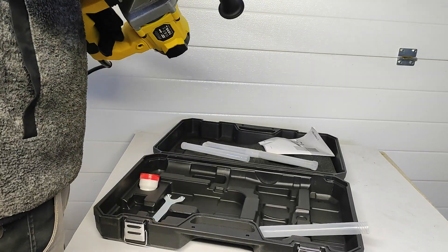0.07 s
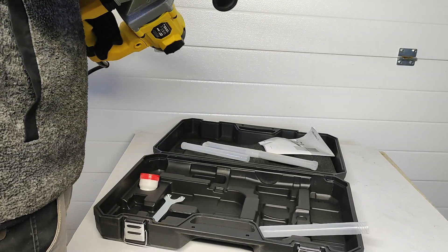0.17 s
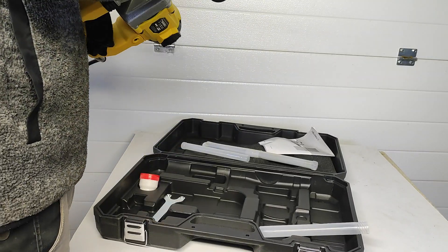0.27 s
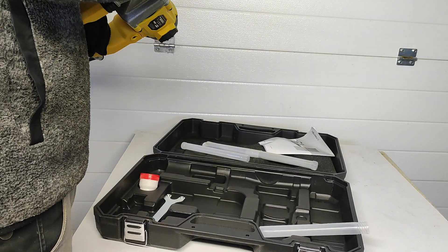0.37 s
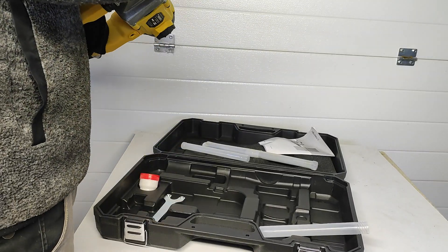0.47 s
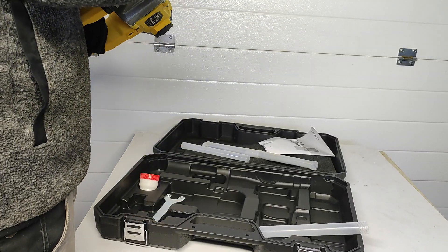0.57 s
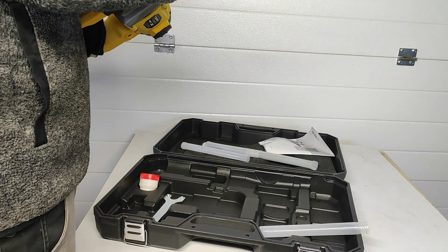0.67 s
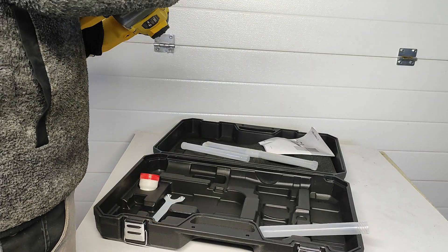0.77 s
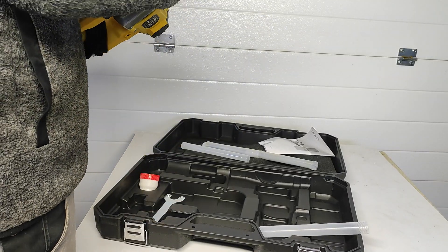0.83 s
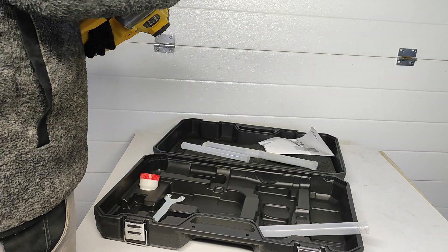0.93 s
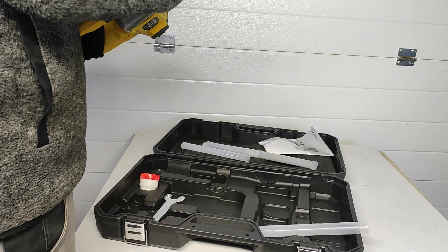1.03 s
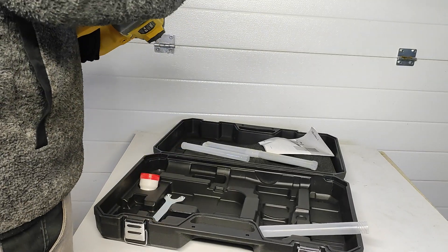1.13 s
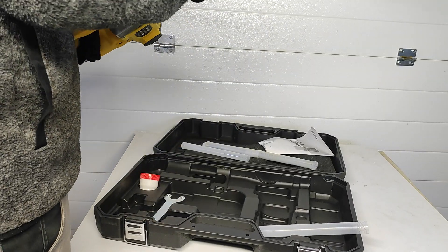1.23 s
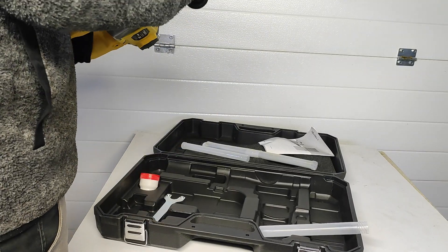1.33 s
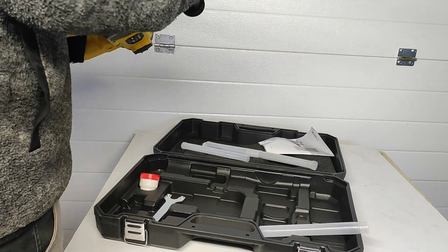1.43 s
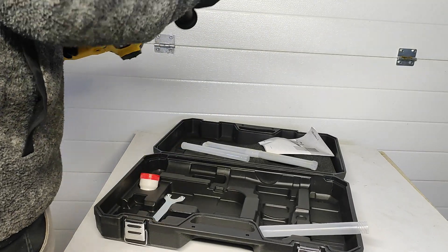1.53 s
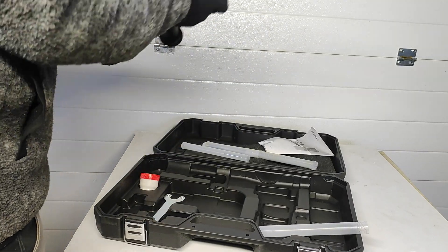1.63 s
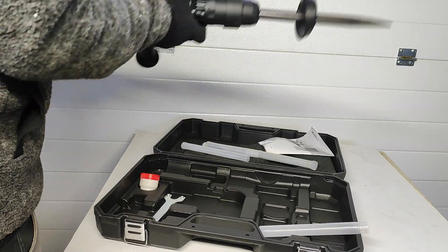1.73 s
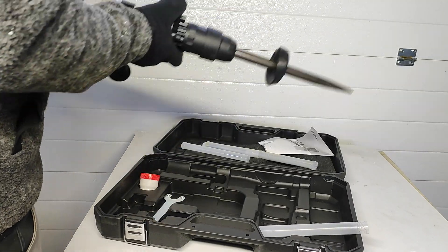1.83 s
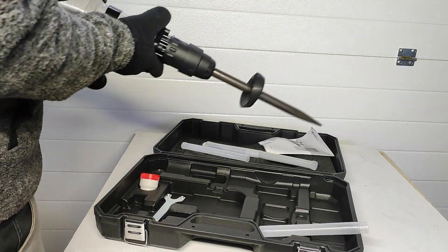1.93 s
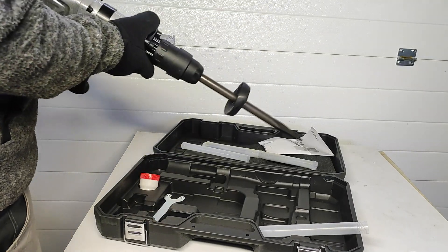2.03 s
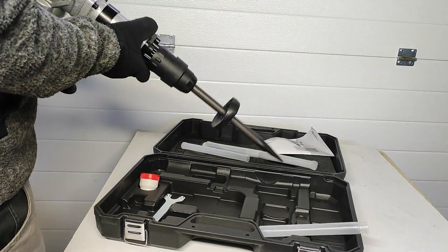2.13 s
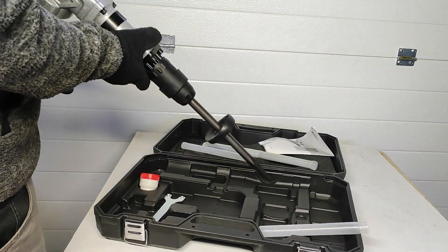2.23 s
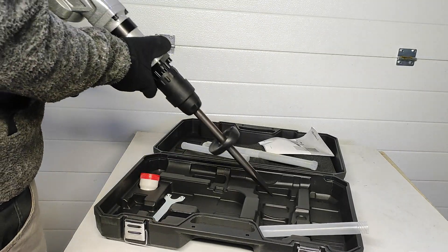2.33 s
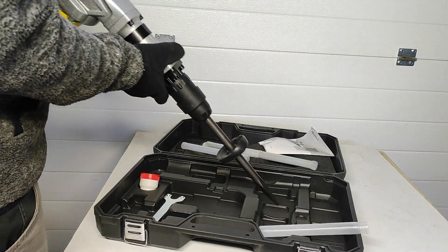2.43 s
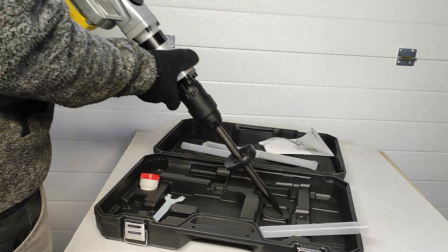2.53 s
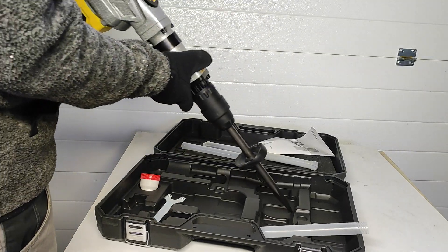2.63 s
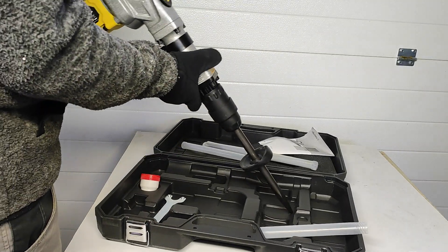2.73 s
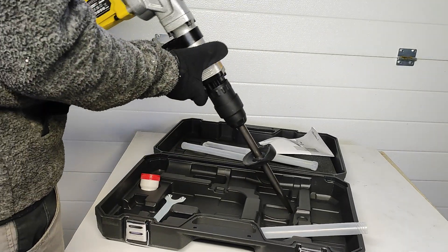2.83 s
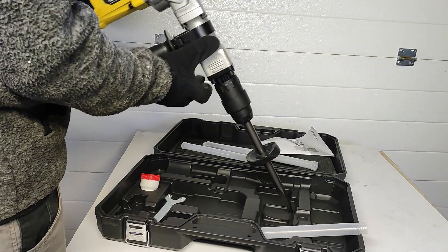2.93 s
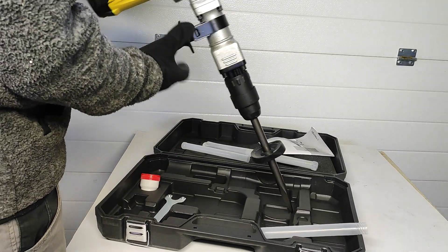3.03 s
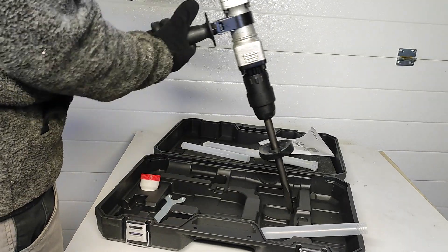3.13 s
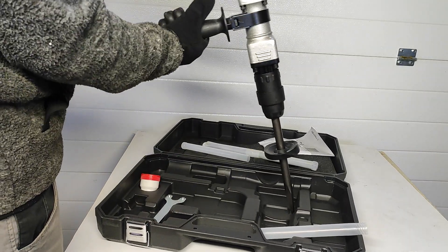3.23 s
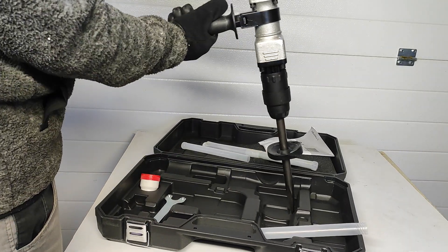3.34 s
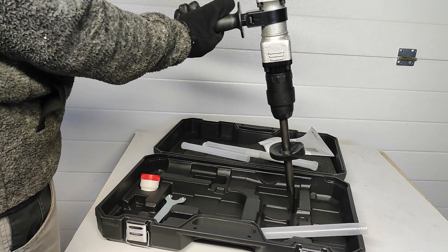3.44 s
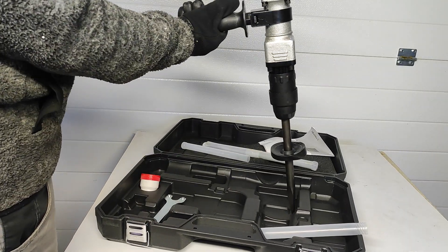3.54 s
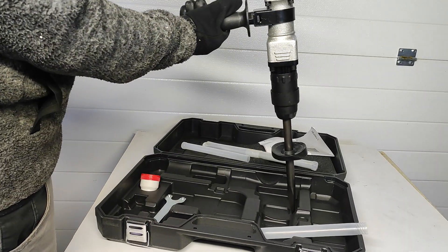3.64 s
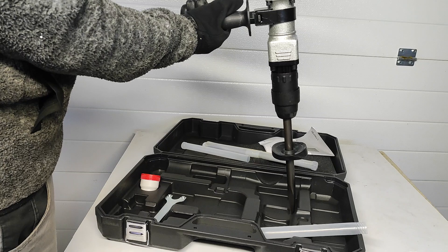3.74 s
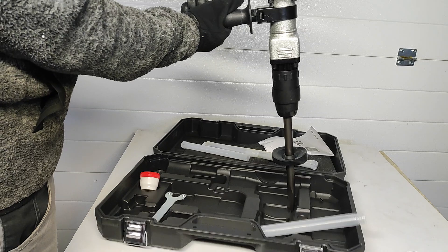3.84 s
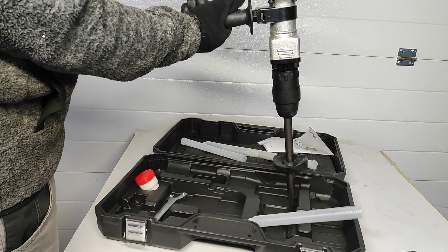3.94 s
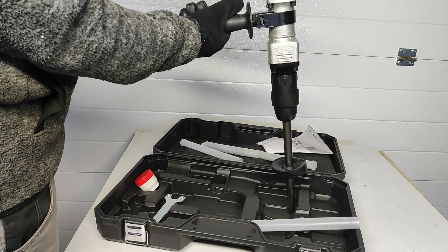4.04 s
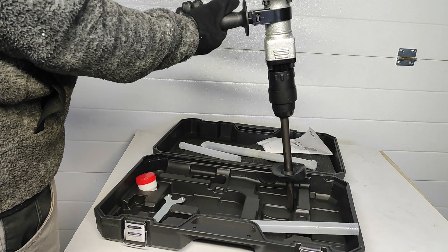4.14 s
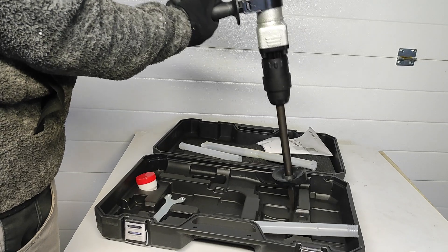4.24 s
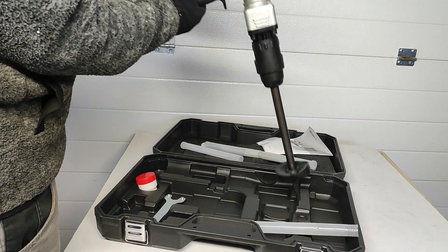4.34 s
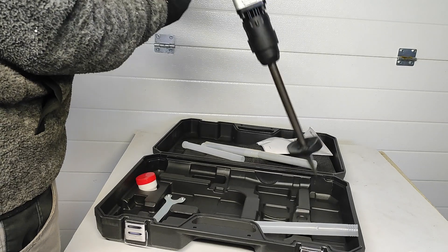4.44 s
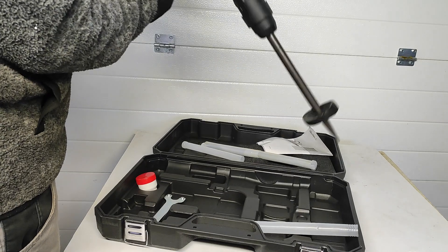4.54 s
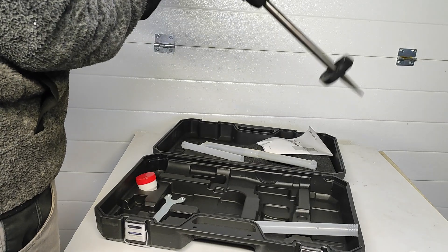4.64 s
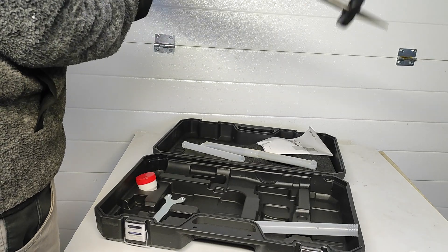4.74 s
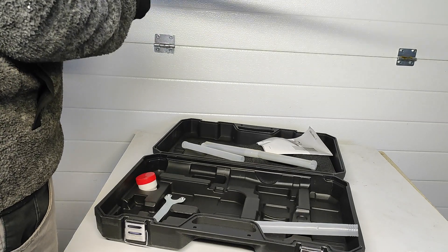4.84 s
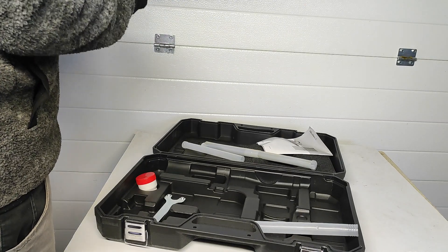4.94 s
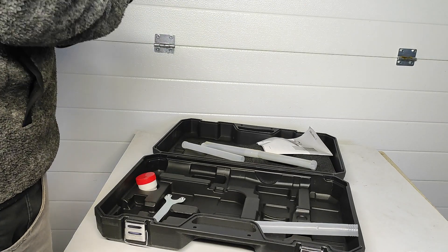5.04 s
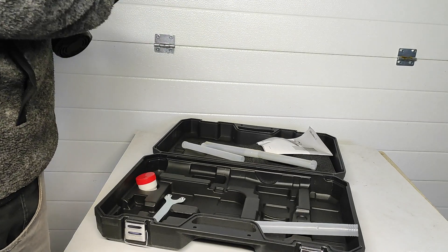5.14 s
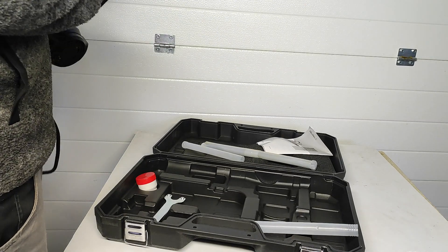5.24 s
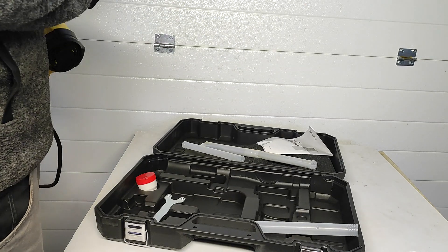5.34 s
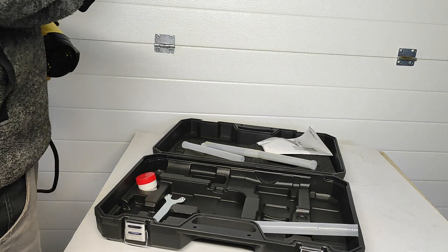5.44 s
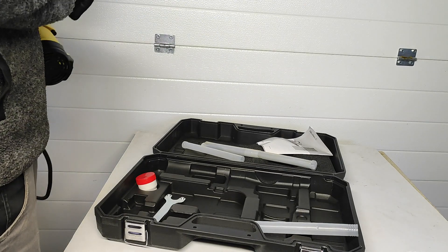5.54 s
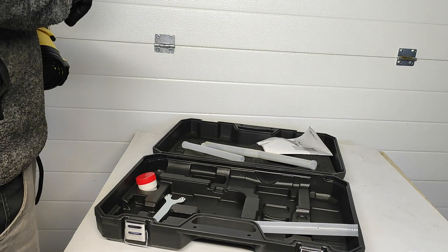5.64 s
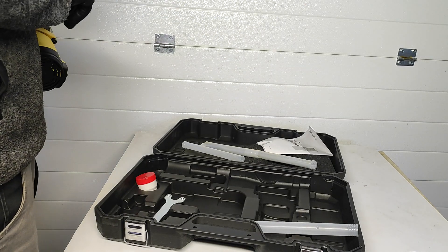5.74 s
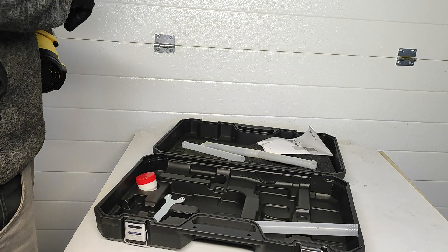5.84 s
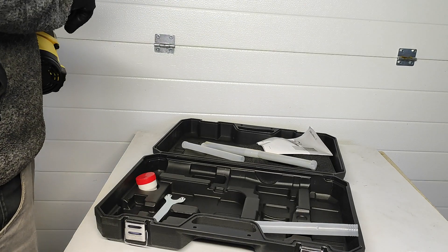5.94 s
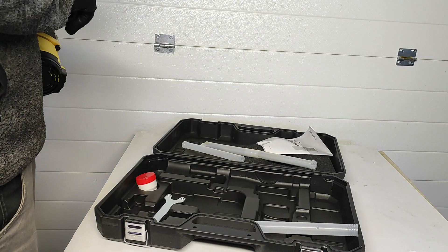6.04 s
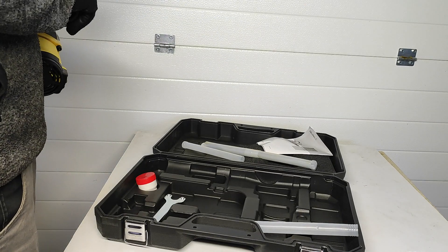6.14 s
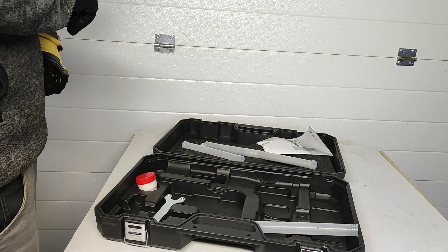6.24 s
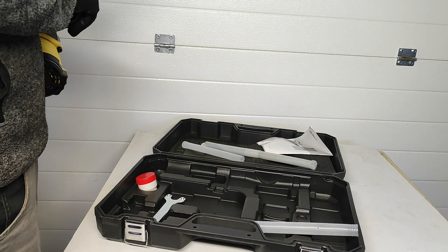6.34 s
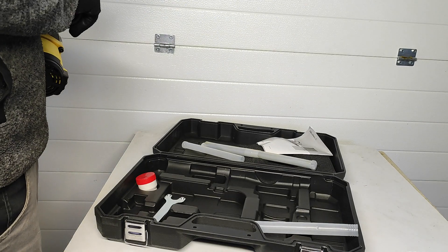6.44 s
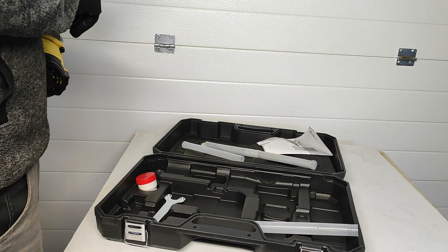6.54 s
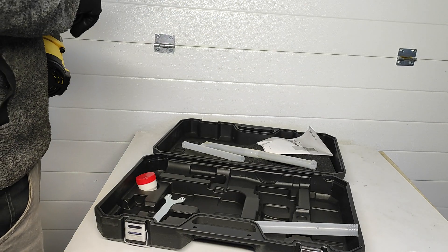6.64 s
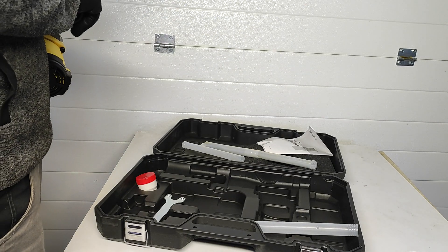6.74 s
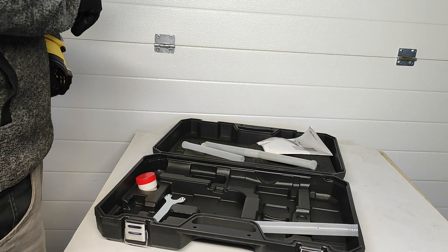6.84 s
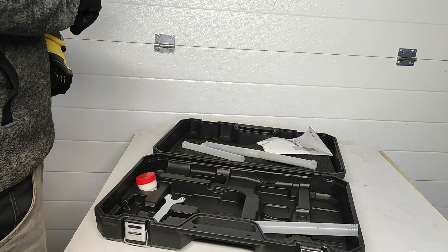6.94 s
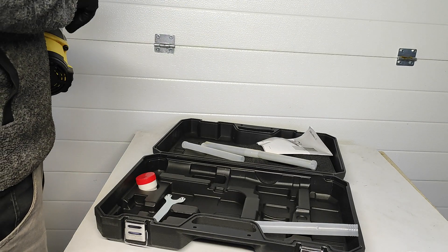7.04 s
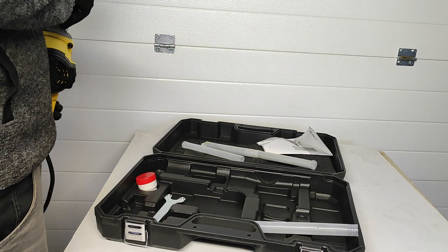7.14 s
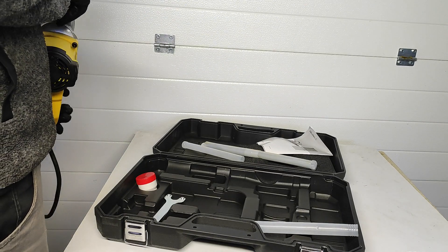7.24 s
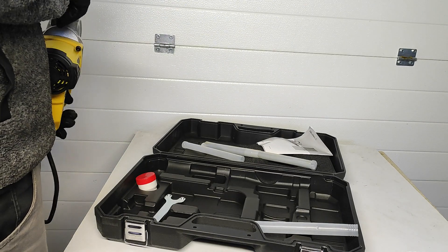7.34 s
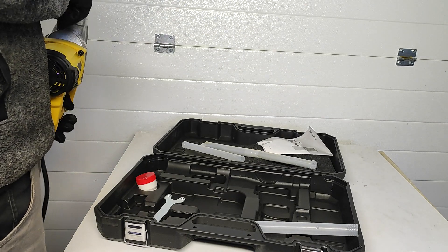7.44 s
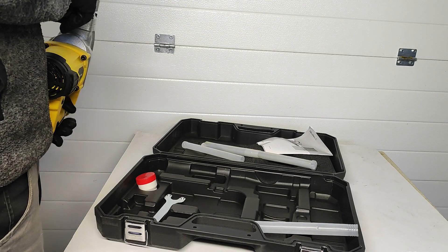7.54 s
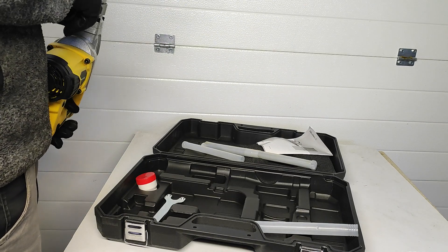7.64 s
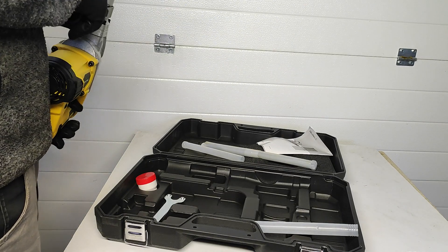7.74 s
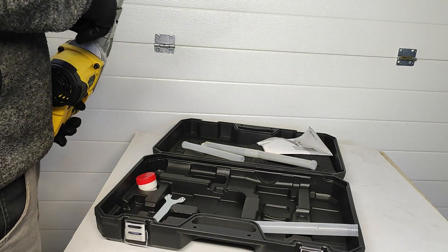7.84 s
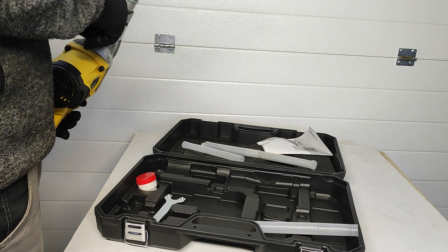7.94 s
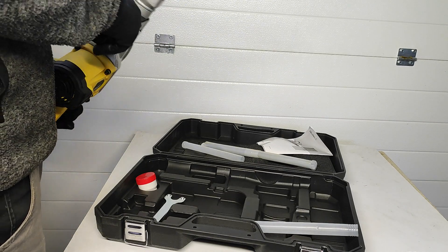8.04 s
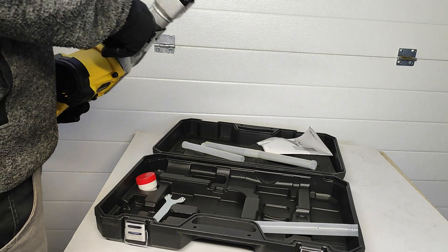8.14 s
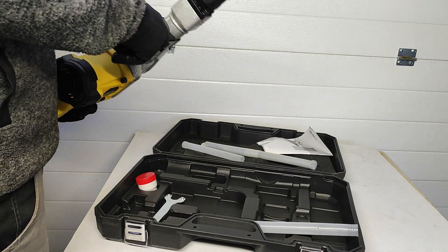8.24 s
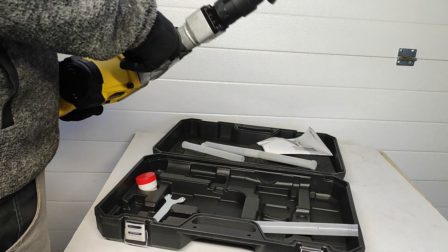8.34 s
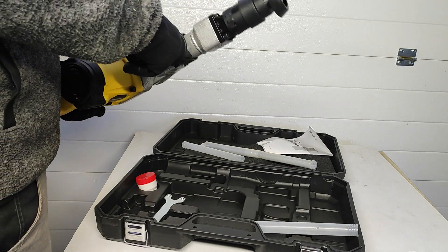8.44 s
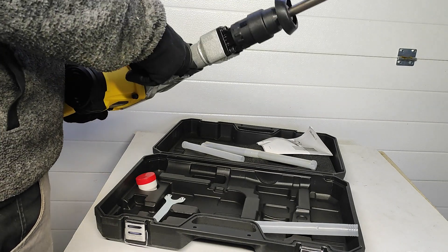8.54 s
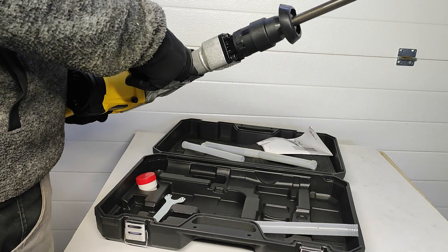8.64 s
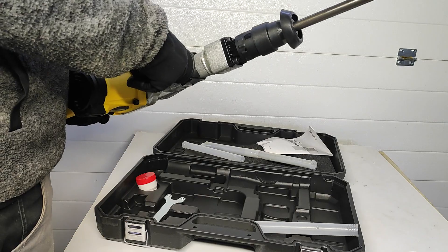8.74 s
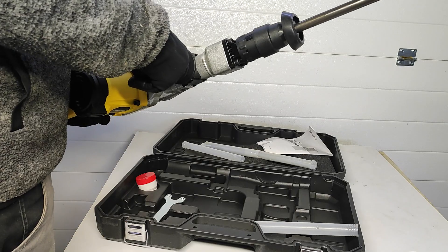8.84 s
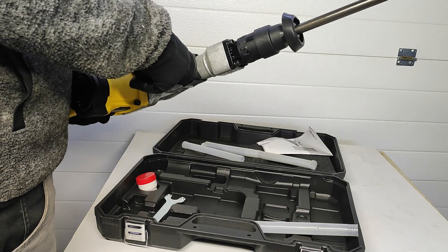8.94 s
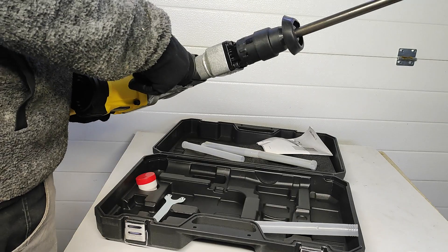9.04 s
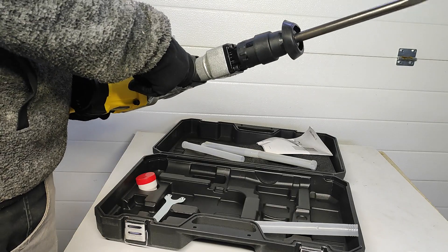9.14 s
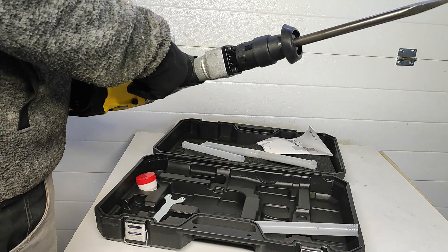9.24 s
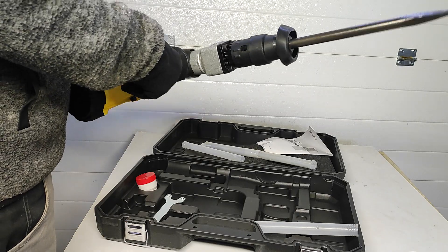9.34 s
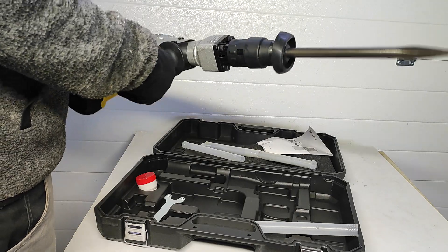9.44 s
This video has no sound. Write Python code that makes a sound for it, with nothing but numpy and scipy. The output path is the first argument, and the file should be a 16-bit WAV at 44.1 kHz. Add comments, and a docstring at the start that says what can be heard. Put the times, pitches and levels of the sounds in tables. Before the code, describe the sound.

An electric demolition hammer whines and rattles in five short runs in a garage, once knocking on a hollow plastic case with jingling metal.

```python
"""An electric demolition hammer whines and rattles in five short runs in a garage, then coasts down each time.
In the second run its tip knocks on its plastic case and makes a loose spanner jingle; in the others it runs in air.
The motor is tones on the rotor speed over gritty noise beaten by the crank; metal and plastic parts are struck
modes and short noise bursts. Clicks, a sliding glove, a rustling sleeve and a far engine complete the scene."""
import sys
import numpy as np
from scipy import signal
from scipy.fft import rfft, irfft, next_fast_len
from scipy.io import wavfile
from scipy.ndimage import map_coordinates

SR = 44100
rng = np.random.default_rng(int(sys.argv[2]) if len(sys.argv) > 2 else 0)


def log_audio(samples):
    """Write samples as a 16-bit WAV file to the path given in sys.argv[1]."""
    # one column per channel
    frames = np.atleast_2d(samples).T
    # limit to full scale, then quantise
    limited = np.clip(frames, -1, 1)
    pcm = np.round(limited * 32767).astype(np.int16)
    wavfile.write(sys.argv[1], SR, pcm)


N = 418509
TIME = np.arange(N) / SR  # s
CRANK_RATIO = 7 / 41  # crank turns per rotor turn
USUAL_SPEED = 225  # rotor turns/s

# blows of the tip resting in the case, fast and then slower: t/s, body gain/dB, crack gain/dB, chisel ping level/dB
BLOWS = [(3.843, -10.5, -17.5, -17.5), (3.876, -20, -21.5, -26.5), (3.907, -17, -28, -22),
         (3.933, -18, -27, -26.5), (3.958, -16, -19.5, -22), (3.983, -21.5, -24, -24),
         (4.009, -16, -16.5, -26), (4.035, -21, -28, -27), (4.074, -31, -33, -24),
         (4.117, -20, -25.5, -24.5), (4.163, -18, -17.5, -24), (4.243, -19, -21, -26.5)]
# resonances of the case on the table: f/Hz, width/Hz, lift/dB
CASE_RESONANCES = [(113, 28, 12.5), (256.7, 74, 3.5), (420, 110, -1), (670, 120, 0), (1008, 210, 2),
                   (3850, 320, 4), (5120, 560, 0.5), (6020, 400, 10.5), (6970, 500, -3.5)]
# spectrum of the low part of a blow: f/Hz, level/dB
THUMP = [(30, -7), (75, -10), (110, -6.5), (280, 1.5), (500, 1.5), (1200, -48)]
# spectrum of the middle part of a blow: f/Hz, level/dB
BODY = [(150, -46), (350, -12.5), (700, 6), (1500, -0.5), (2300, -2.5), (4000, -13), (6000, -25),
        (16000, -58.5)]
# spectrum of the bright part of a blow: f/Hz, level/dB
CRACK = [(1500, -17.5), (3500, 4), (5000, -0.5), (8000, -7), (9500, -19), (11500, -12), (15500, -11)]


def amp(db):
    """Turns decibels into a gain."""
    return 10 ** (np.asarray(db) / 20)


def unit(x):
    """Scales a sound to rms 1."""
    return x / np.sqrt(np.mean(x ** 2) + 1e-20)


def read(points, hz):
    """Reads a table of values between its points, on a log-frequency axis."""
    f, value = np.transpose(points)
    return np.interp(np.log(hz + 1), np.log(f + 1), value)


def follow(rows):
    """Gives each column of a timed table a value at every sample."""
    s, *columns = np.transpose(rows)
    return [np.interp(TIME, s, column) for column in columns]


def add(mix, s, sound):
    """Mixes a sound in at time s, cutting what runs past the end."""
    part = mix[..., max(round(s * SR), 0):][..., :sound.shape[-1]]
    part += sound[..., :part.shape[-1]]


def colour(x, spectrum, resonances=(), size=4096):
    """Filters with a smooth spectrum and resonant lifts; like a real object, it never answers before the blow."""
    hz = np.fft.rfftfreq(size, 1 / SR)
    db = read(spectrum, hz)
    db = db + sum(lift / (1 + (2 * (hz - f) / width) ** 2) for f, width, lift in resonances)
    log_gain = np.log(amp(np.r_[db, db[-2:0:-1]]))
    # the Hilbert transform finds the phase that keeps the filter causal
    taps = np.fft.ifft(np.exp(np.conj(signal.hilbert(log_gain)))).real
    return signal.oaconvolve(x, taps)[:len(x)]


def noise(spectrum):
    """Steady coloured noise of rms 1."""
    return unit(colour(rng.standard_normal(N), spectrum))


def wander(rate_hz):
    """A random line of rms 1 that heads for a new value rate_hz times a second."""
    knots = rng.standard_normal(N // 8)
    return unit(np.interp(TIME * rate_hz, np.arange(len(knots)), knots))


def swells(rows, rise_db_per_s, fall_db_per_s):
    """Gain of a set of swells that each rise, hold and fall away."""
    gain = 0
    for s, hold, db in rows:
        rise = rise_db_per_s * np.maximum(s - TIME, 0)
        fall = fall_db_per_s * np.maximum(TIME - s - hold, 0)
        gain = gain + amp(db - rise - fall)
    return gain


def ring(modes, wobble=1.0, wobble_hz=70, scatter_db=0, pitch=1):
    """A struck part, about rms 1 at the start: its modes die away and waver as the part chatters in its seat."""
    hz, db, t60 = np.transpose(modes)[:, :, None]
    # with scatter, each blow favours other modes
    db = db + scatter_db * rng.standard_normal(db.shape)
    t = np.arange(SR // 2) / SR
    # complex chance shifts both the strength and the phase of a mode
    knots = rng.standard_normal((len(hz), 200, 2)) @ [1, 1j]
    waver = np.array([np.interp(t * wobble_hz, np.arange(len(k)), k) for k in knots])
    tones = np.exp(2j * np.pi * (pitch * hz * t + rng.random(hz.shape)))
    waves = amp(db - 60 * t / t60) * ((1 + wobble * waver) * tones).real
    onset = np.minimum(t * 1000, 1)  # 1 ms
    return waves.sum(0) * onset * np.sqrt(2 / np.sum(amp(2 * db)) / (1 + wobble ** 2))


def burst(spectrum, resonances, t60, rise_s=0.003):
    """A dense cluster of short-lived modes as fading noise, with the energy of 10 ms at rms 1."""
    t = np.arange(SR // 4) / SR
    # each blow lands on another spot and favours other modes
    spot = [(hz, hz / 6, 3 * rng.standard_normal()) for hz in np.geomspace(500, 15000, 16)]
    envelope = np.exp(-np.log(1000) * t / t60) * (1 - np.exp(-t / rise_s))
    x = colour(rng.standard_normal(len(t)) * envelope, spectrum, [*resonances, *spot])
    return x / np.sqrt(np.sum(x ** 2) / (SR / 100))


def place(x, lead_ms, pan_db):
    """Sets a direction: sound from the left reaches the left microphone first; pan_db is left over right."""
    lag = round(lead_ms * SR / 1000)
    left, right = (np.pad(x, (max(k, 0), 0))[:len(x)] for k in (-lag, lag))
    return np.array([left * amp(pan_db / 2), right * amp(-pan_db / 2)])


def diffuse(pair, port_gap_s=0.0003):
    """Sound from all sides is most alike in the bass; port_gap_s is its travel time between the microphones."""
    a, b = rfft(pair)
    same = np.sinc(2 * port_gap_s * np.fft.rfftfreq(pair.shape[1], 1 / SR)) * .78
    mid, side = a * np.sqrt((1 + same) / 2), b * np.sqrt((1 - same) / 2)
    return irfft(np.array([mid + side, mid - side]), pair.shape[1])


def garage(x, wet_db, first_s=0.002, build_s=0.0029):
    """Hard walls close by: echoes thicken quickly, die at their own speed in each band, and keep shifting."""
    # how long echoes last: f/Hz, t60/s
    echo_time = [(100, 0.94), (300, 0.45), (800, 0.62), (2000, 0.67), (5000, 0.5), (9000, 0.42),
                 (16000, 0.15)]
    # three random echo patterns trade places, their total power staying even
    a, b = 2 * np.pi * np.outer([1.1, .7], TIME)
    wet = 0
    for share in np.cos(a), np.sin(a) * np.cos(b), np.sin(a) * np.sin(b):
        sparse = rng.standard_normal((2, SR)) * (rng.random((2, SR)) < .1)
        hz, t, z = signal.stft(sparse, SR, nperseg=256)
        fade = np.exp(-np.log(1000) * t / read(echo_time, hz)[:, None])
        tail = signal.istft(z * fade, SR, nperseg=256)[1][:, :SR]
        tail = diffuse(tail * np.clip((TIME[:SR] - first_s) / build_s, 0, 1))
        wet = wet + signal.oaconvolve(x * share, tail / np.linalg.norm(tail[0]), axes=1)[:, :N]
    return (x + amp(wet_db) * wet) / np.sqrt(1 + amp(2 * wet_db))


def far_engine():
    """Harmonics of the firing rate, which rises and eases off with a slight waver."""
    # speeding up and easing off: t/s, firing rate f/Hz, gain/dB
    drone_course = [(5.0, 46.02, -71), (5.65, 52.2, -57), (6.5, 66, -55.5), (7.65, 82.4, -52.5),
                    (8.25, 66.1, -52.5), (8.6, 57.1, -61.5), (9.4, 47.9, -58)]
    # harmonics: multiple of the firing rate, level/dB
    drone_orders = [(1, -3.5), (2, -6.5), (3, -14), (4, -18.5), (5, -24)]
    hz, drone_db = follow(drone_course)
    angle = 2 * np.pi * np.cumsum(hz * (1 + 0.013 * wander(14))) / SR
    tones = sum(amp(db + 1.7 * wander(2.5)) * np.sin(k * angle) for k, db in drone_orders)
    return place(np.sqrt(2) * amp(drone_db) * tones, lead_ms=0, pan_db=-0.5)


def hush_and_sleeve():
    """Steady room noise, and cloth noise that swishes as the arm moves, from all sides."""
    # room hush: f/Hz, level/dB
    hush = [(18, -39.5), (30, -12), (101, -2.5), (577, -11), (659, -20), (2810, -22), (4530, -26.5),
            (5030, -23.5), (8090, -34.5), (8990, -48), (10800, -33), (15200, -20), (16500, -38)]
    # sleeve rustle: f/Hz, level/dB
    cloth = [(100, 5), (250, 0.5), (600, 3.5), (1500, 0.5), (3000, -1), (6000, -35), (12000, -22)]
    # swishes as the arm moves: t/s, hold/s, gain/dB
    swishes = [(0, 0.049, -77), (5.53, 0.12, -54.5), (6.1, 0.035, -62)]
    hush_db, rest_db = -62, -67.5
    rustle = amp(rest_db) + swells(swishes, rise_db_per_s=253, fall_db_per_s=108.5)
    rustle = rustle * amp(1.0 * wander(36))
    air = np.array([amp(hush_db) * noise(hush) + rustle * noise(cloth) for _ in range(2)])
    # padded to a length that transforms fast
    return diffuse(np.pad(air, ((0, 0), (0, next_fast_len(N) - N))))[:, :N]


def low_shaking():
    """Deep noise from the shaking table and gusts from the fan, partly alike at both microphones."""
    # f/Hz, level/dB
    deep = [(6, 7.5), (11, -14.5), (25, -26), (60, -39), (150, -60.5), (500, -88)]
    # t/s, hold/s, gain/dB
    rumbles = [(3.83, 0.52, -42.5), (6.5, 0.089, -46), (8.72, 0.037, -50)]
    rest_db = -62
    gain = amp(rest_db) + swells(rumbles, rise_db_per_s=500.5, fall_db_per_s=37)
    return gain * (noise(deep) + .7 * np.array([noise(deep), noise(deep)]))


def background():
    """Room hush, sleeve rustle, low shaking and the far engine together."""
    return hush_and_sleeve() + low_shaking() + far_engine()


def handling(body_gain_db=-3, thump_gain_db=-2, crack_gain_db=-5):
    """Short dead noise bursts for trigger, gears, grip and holder, and hissing noise for a sliding glove."""
    # the glove slides on the handle: t/s, hold/s, level/dB
    slides = [(2.255, 0.039, -44.5)]
    # glove spectrum: f/Hz, level/dB
    glove = [(500, -13), (1800, 4), (5000, 5.5), (8000, -5), (9500, -19), (15000, -6)]
    # resonances of the grip: f/Hz, width/Hz, lift/dB
    grip = [(850, 1300, -3.5), (1720, 1000, 4.5)]
    # trigger, gear slack, grip and holder clicks, before the three gains above:
    # t/s, body/dB, thump/dB, crack/dB, length of body and crack against the usual click
    clicks = [(.415, -20.5, -47.5, -16.5, 0.92), (2.018, -36, -36, -55, 0.82),
              (2.248, -55.5, -39.5, -54, 0.95), (3.377, -47, -53.5, -44.5, 0.87),
              (3.795, -36.5, -52, -35, 1.04), (4.566, -63, -54, -44.5, 0.77),
              (5.595, -27, -52.5, -18.5, 1.3), (6.091, -47, -45.5, -53, 1), (6.375, -43, -58.5, -41, .5),
              (6.387, -28.5, -44, -19, 1), (6.41, -23.5, -51.5, -17.5, 0.74), (6.433, -34, -47, -10, 1),
              (7.551, -29, -43, -34, 1.9), (7.576, -18.5, -44, -13, 1.5), (8.631, -37.5, -55, -26.5, 0.25),
              (8.647, -21.5, -47, -19, 1.1), (8.663, -23.5, -43, -15, .8), (8.719, -35, -38, -15, 0.57),
              (8.815, -15.5, -41, -12, 1.2)]
    out = swells(slides, rise_db_per_s=1999, fall_db_per_s=200) * noise(glove)
    for s, body_db, thump_db, crack_db, length in clicks:
        add(out, s, amp(body_db + body_gain_db) * burst(BODY, grip, t60=0.059 * length))
        add(out, s, amp(thump_db + thump_gain_db) * burst(THUMP, grip, t60=0.031))
        add(out, s, amp(crack_db + crack_gain_db) * burst(CRACK, grip, t60=0.051 * length))
    return place(out, lead_ms=.12, pan_db=2.5)


def rib():
    """The tip catches on a stiff rib of the case and snaps over it: its modes give a dry, pitched tock."""
    # t/s, level/dB
    taps = [(3.2745, -14), (3.277, -12.5)]
    # modes of the rib: f/Hz, level/dB, t60/s
    rib_modes = [(812, -1, 0.026), (1566.6, 2.5, 0.008), (2570, -14, 0.01), (3150, -8.5, 0.0079),
                 (4050, -5, 0.007), (5460, -13.5, 0.0064), (7000, -21, .01)]
    out = np.zeros(N)
    for s, db in taps:
        add(out, s, amp(db) * ring(rib_modes, wobble=.2))
    return place(out, lead_ms=-.04, pan_db=3.5)


def grains(spectrum, per_s):
    """Many small random contacts sounding through the case, rms 1."""
    contacts = rng.standard_normal(N) * (rng.random(N) < per_s / SR)
    return unit(colour(contacts, spectrum, CASE_RESONANCES))


def rubbing():
    """The shaken case and its loose parts jostle on the table, and the tip drags over the plastic."""
    # jostling: t/s, hold/s, level/dB
    jostles = [(3.93, 0.32, -26)]
    # its spectrum: f/Hz, level/dB
    jostle = [(30, -4), (70, -13), (110, -6.5), (200, -9), (400, -0.5), (650, -7), (1100, -13.5),
              (2500, -13), (6000, -25), (15000, -53)]
    # dragging: t/s, hold/s, level/dB
    scrapes = [(2.91, 0.018, -42), (3.225, 0.066, -52.5), (3.295, 0.031, -43)]
    # its spectrum: f/Hz, level/dB
    scrape = [(100, -9), (400, 0), (900, -1), (1600, -7.5), (3000, -11.5), (6500, -25.5), (9000, -29.5),
              (15000, -34)]
    out = swells(jostles, rise_db_per_s=207.5, fall_db_per_s=78.5) * grains(jostle, per_s=440)
    return out + swells(scrapes, rise_db_per_s=400.5, fall_db_per_s=203.5) * grains(scrape, per_s=2500)


def case_blow(out, s, body_db, thump_db, crack_db):
    """One hit on the case: noise bursts for the hollow shell, struck modes for table and spanner."""
    # modes of the table under the case: f/Hz, level/dB, t60/s
    table_modes = [(93, -1, 0.57), (117.2, 0.5, 0.54)]
    # modes of the loose spanner: f/Hz, level/dB, t60/s
    spanner = [(4470, -4, 0.2), (6240, -5, .3), (7490, 3.5, .11), (7930, 5, 0.21), (8910, -7.5, 0.17),
               (10800, -11, .35), (11370, -3, .33), (12900, -1.5, .22), (13330, -1, .5), (13850, -3, .45),
               (14600, -1, .35), (15600, 4, .14)]
    add(out, s, amp(body_db - 4) * burst(BODY, CASE_RESONANCES, t60=0.057))
    add(out, s, amp(thump_db + 2) * burst(THUMP, CASE_RESONANCES, t60=0.056))
    add(out, s, amp(thump_db - 17) * ring(table_modes, wobble=0))
    add(out, s, amp(crack_db - 3) * burst(CRACK, CASE_RESONANCES, t60=0.035, rise_s=0.0008))
    add(out, s, amp(crack_db - 13) * ring(spanner, scatter_db=4.5))


def case(bounces=6, bounce_gap_s=0.0068, bounce_loss_db=3.5):
    """The hollow shell thuds under the tip, hops and clatters back in a quick string of fading bounces."""
    # the tip is set down: t/s, thud level/dB, thud pitch factor, hop/s, clatter gain/dB, boom gain/dB
    knocks = [(2.638, -11.5, 0.81, 0.012, -19.5, -27.5), (2.787, -12, 1.33, 0.0098, -22, -32),
              (3.807, -16, 1.6, 0.002, -17.5, -48)]
    # modes of the shell under the tip: f/Hz, level/dB, t60/s
    thud = [(328.4, -11.5, 0.032), (524, 0, 0.018), (842, -1, 0.024), (1227, -5.5, .025),
            (2000, -5.5, 0.017)]
    out = rubbing()
    for s, body_db, crack_db, _ in BLOWS:
        case_blow(out, s, body_db, body_db - 11, crack_db)
    for s, thud_db, pitch, hop_s, clatter_db, boom_db in knocks:
        add(out, s, amp(thud_db) * ring(thud, wobble=0.4, pitch=pitch))
        add(out, s, amp(thud_db - 29) * burst(CRACK, CASE_RESONANCES, t60=0.014))
        for k in range(bounces):
            at = s + hop_s + bounce_gap_s * (k + rng.uniform(-.3, .3))
            body_db = clatter_db - k * bounce_loss_db
            case_blow(out, at, body_db, boom_db - k * bounce_loss_db, body_db - 3)
    return place(out, lead_ms=-.03, pan_db=-.5)


def chisel():
    """Struck steel modes: the striker throws the loose chisel against its holder; in the case it only pings."""
    # steel on steel in the holder: t/s, clang level/dB, ping level/dB, pan/dB
    clangs = [(1.044, -19, -44.5, -4.5), (1.074, -20.5, -43, 6.5), (1.14, -13, -54, 1.5),
              (1.325, -16.5, -48.5, -3), (1.404, -12.5, -54.5, 5.5), (5.596, -17.5, -67, 2.5),
              (6.386, -12, -43.5, 7), (6.432, -20, -26, -11), (6.472, -15, -30.5, -11.5),
              (7.979, -15, -57.5, 1.5), (8.688, -26, -24.5, 8)]
    # modes of the clang: f/Hz, level/dB, t60/s
    clang_modes = [(2170, -20.5, 0.39), (3806, 0, 0.46), (3897, 5.5, 0.15), (5845, 7, 0.28),
                   (5780, -2.5, 0.31), (7900, -10.5, .15), (8090, 2.5, 0.13), (10800, -8.5, 0.23),
                   (13300, -7, 0.27), (13820, -7.5, .17)]
    # modes of the chisel's high ping: f/Hz, level/dB, t60/s
    ping_modes = [(8580, -3.5, 0.2), (8600, -3, 0.25), (10900, -19, 0.25), (13870, -13, .18),
                  (15283, -17, .25)]
    out = np.zeros((2, N))
    for s, _, _, ping_db in BLOWS:
        add(out, s, place(amp(ping_db) * ring(ping_modes), lead_ms=.1, pan_db=0))
    for s, clang_db, ping_db, pan_db in clangs:
        sound = amp(clang_db) * ring(clang_modes) + amp(ping_db) * ring(ping_modes)
        add(out, s, place(sound, lead_ms=.1, pan_db=pan_db))
    return out


def rotor(pulls, spin_up_s=.16):
    """Turns a second: energy climbs to a limit while the trigger is held, then friction slows the rotor evenly."""
    speed = np.zeros(N)
    for on, off, top, loss in pulls:
        before = np.interp(on, TIME, speed)
        held = np.clip(TIME - on, 0, off - on)
        # energy goes with the square of the speed
        driven = np.sqrt(top ** 2 + (before ** 2 - top ** 2) * np.exp(-held / spin_up_s))
        coasting = np.maximum(driven - loss * np.maximum(TIME - off, 0), 0)
        speed = np.where(TIME < on, speed, coasting)
    return speed


def loudness(speed, db_per_octave=5, lag_s=0.0018, swell_s=0.026):
    """Gain that grows with the speed, a moment behind it; some runs start subdued, then swell to full level."""
    # subdued starts: from t/s, until t/s, change/dB
    subdued = [(.38, 0.392, -10.5), (6.353, 6.535, -5.5), (7.53, 7.551, -7.5), (8.603, 8.779, -12)]
    keep = np.exp(-1 / (lag_s * SR))
    target = amp(db_per_octave * np.log2(speed / USUAL_SPEED + 1e-12))
    gain = signal.lfilter([1 - keep], [1, -keep], target)
    cut_db = sum(db * (TIME >= s) * np.clip(1 - (TIME - until) / swell_s, 0, 1) for s, until, db in subdued)
    return gain * amp(cut_db)


def mechanism(turns, stroke_share=0.63, slap_turns=0.2, grain_db=2, grains_per_s=4000, hiss=0.5):
    """Piston and striker slap at both ends of each crank turn, over gear chatter and fan hiss."""
    crank = turns * CRANK_RATIO
    half = (2 * crank).astype(int)  # counts half turns
    # every slap has its own strength, and every other one is weaker on average
    force = amp(2 * rng.standard_normal(N)[half]) * np.where(half % 2, stroke_share, 1)
    slaps = force * np.exp(-(2 * crank % 1) / (2 * slap_turns))
    strength = amp(grain_db * np.minimum(rng.exponential(1, N), 2))
    chatter = rng.standard_normal(N) * strength * (rng.random(N) < grains_per_s / SR)
    return unit(unit((0.37 + slaps) * chatter) + hiss * rng.standard_normal(N))


def crank_hum(turns, count=24):
    """The piston's stroke repeats, so a comb of fine harmonics glides with the speed."""
    crank = turns * CRANK_RATIO
    return unit(sum(np.cos(2 * np.pi * (k * crank + rng.random())) for k in range(1, count)))


def whine(turns, speed, flutter_db=4, jitter_turns=0.0032):
    """Tones on multiples of the rotor speed that fade as it slows."""
    # imbalance, gear mesh with crank sidebands, fan, higher mesh harmonics:
    # multiple of the rotor speed, gain/dB before flutter and speed
    orders = [(1, -32), (2, -30), (6.83, -13), (7, -15), (7.17, -17), (12, -16.5), (13, -11),
              (13.83, -13.5), (14, -17.5), (21, -20.5), (28, -20)]
    angle = 2 * np.pi * (turns + jitter_turns * wander(70))
    lines = sum(amp(db + flutter_db * wander(35)) * np.cos(order * angle) for order, db in orders)
    return np.sqrt(2) * lines * speed / speed.max()


def near_echoes(x, count=6):
    """Table, door and the user's body throw back echoes whose paths shift as the tool sways."""
    echo = np.zeros(N)
    for delay_s in rng.uniform(.002, .012, count):
        path = (TIME - delay_s - .0002 * wander(4)) * SR
        echo += rng.choice([-1, 1]) * map_coordinates(x, [path], order=3)
    return unit(x + .22 * echo)


def flicker(x, depth_db, patch_hz, patch_s, full_hz):
    """Narrow bands swell and fade at random, more deeply up to full_hz."""
    hz, t, z = signal.stft(x, SR, nperseg=1024, noverlap=768)
    grid = np.meshgrid(hz / patch_hz, t / patch_s, indexing="ij")
    patches = unit(map_coordinates(rng.uniform(-1, 1, (400, 400)), grid, order=1, mode="wrap"))
    depth = depth_db * np.minimum(hz / full_hz, 1)[:, None]
    # a sample of the patches tells how much power the flicker adds, which is taken out again
    power = np.mean(amp(2 * depth * patches.ravel()[::997]), axis=1, keepdims=True)
    gain = amp(depth * patches) / np.sqrt(power)
    return unit(signal.istft(z * gain, SR, nperseg=1024, noverlap=768)[1][:N])


def motor(treble_split_hz=3200, treble_db_per_hz=0.0134):
    """Five runs: speed makes the rattle louder and brighter, and the tool's pose sets its colour and direction."""
    # trigger pulls, one list a run: on t/s, off t/s, speed it heads for/(turns/s), coasting loss/(turns/s per s)
    pulls_by_run = [
        [(.388, .915, 286, 590), (1.115, 1.275, 317, 570), (1.42, 1.55, 278, 565)],
        [(3.789, 3.964, 290, 673)],
        [(6.363, 6.608, 275.6, 750)],
        [(7.536, 7.755, 296, 750)],
        [(8.624, 8.9, 283, 900), (9.02, 9.255, 275, 940), (9.35, 9.49, 287, 750)],
    ]
    # how the tool is held in each run:
    # pose, gain at the usual speed/dB, tilt/(dB per octave), whine gain/dB, left lead/ms, pan/dB
    runs = [("side-on", -16, 0.098, -.5, .09, 0), ("side-on", -29.5, -.5, -6, -.03, -.5),
            ("upright", -18, -1.5, -1, 0.16, -0.41), ("upright", -16.5, 0.091, -0.46, 0.19, 1),
            ("forward", -15.5, .2, -0.74, .15, -0.15)]
    # colour of the rattle with the tool side-on: f/Hz, level/dB
    side_on = [(59, -50), (100, -31), (471, -16.5), (583, -4), (1200, -7), (1800, -9), (2370, -7.5),
               (2700, -1), (3700, -1.5), (4250, -3.5), (4980, -1.5), (5530, -15), (5900, -7), (9020, -21.5),
               (16000, -23.5)]
    # colour with the tool upright: f/Hz, level/dB
    upright = [(59, -41), (100, -35), (234, -15.5), (330, -20), (621, 0), (2420, -2.5), (2680, 3),
               (3350, 3), (3650, 3), (4200, 0), (4980, 4.5), (5530, -7), (6400, -2.5), (8830, -11.5),
               (9610, -10.5), (16000, -15)]
    # colour with the tool pointing forward: f/Hz, level/dB
    forward = [(59, -48), (100, -35), (558, -11.5), (662, -4.5), (1610, -4.5), (1910, -13.5), (2990, 4),
               (3600, -2.5), (4200, -3), (4870, -1), (5650, -9), (7610, -14), (9020, -18.5), (15000, -19.5),
               (16000, -25)]
    # resonances of the housing: f/Hz, width/Hz, lift/dB
    housing = [(600, 160, 1.5), (1831, 200, 4), (2150, 260, 7), (2690, 130, 1), (4265, 260, -8),
               (5080, 420, 3.5), (5640, 160, -9.5), (7150, 110, -1), (7840, 490, 8), (8770, 300, -8),
               (15500, 670, 12)]
    poses = {"side-on": side_on, "upright": upright, "forward": forward}
    speeds = [rotor(pulls) for pulls in pulls_by_run]
    speed = sum(speeds)
    turns = np.cumsum(speed) / SR
    drive = near_echoes(mechanism(turns) + amp(-16) * crank_hum(turns))
    drive = flicker(drive, depth_db=2, patch_hz=150.74, patch_s=.05, full_hz=600)
    # narrow bands of the rattle swell and fade at random, most above 3.5 kHz
    drive = flicker(drive, depth_db=3.5, patch_hz=115, patch_s=.08, full_hz=3500)
    lines = whine(turns, speed)
    gain = loudness(speed)
    brightness = amp(treble_db_per_hz * (speed - USUAL_SPEED))
    high_pass = signal.butter(1, treble_split_hz, "high", fs=SR, output="sos")
    out = np.zeros((2, N))
    for run, (pose, level_db, tilt_db, whine_db, lead_ms, pan_db) in zip(speeds, runs):
        turning = np.flatnonzero(run)
        span = slice(turning[0], turning[-1] + SR // 4)
        spectrum = [(hz, db + tilt_db * np.log2(hz)) for hz, db in poses[pose]]
        rattle = unit(colour(drive[span], spectrum, housing))
        treble = signal.sosfiltfilt(high_pass, rattle)
        tool = rattle + (brightness[span] - 1) * treble + amp(whine_db) * lines[span]
        out[:, span] += place(amp(level_db) * gain[span] * tool, lead_ms, pan_db)
    return out


def scene():
    """Everything in the garage, each source with its own share of echo."""
    small_sounds = garage(handling() + rib(), wet_db=-8)
    plastic = garage(case(), wet_db=-2.5)
    steel = garage(chisel(), wet_db=-5)
    machine = garage(motor(), wet_db=-1.0)
    return background() + small_sounds + plastic + steel + machine


def record(dry, edge_hz=16100):
    """Clips at full scale, then removes what lies above edge_hz."""
    low_pass = signal.firwin(255, edge_hz, window=("kaiser", 8), fs=SR)
    return signal.oaconvolve(np.clip(dry, -1, 1), low_pass[None], "same", axes=1)


dry = scene()
out = record(dry)
log_audio(out)
```